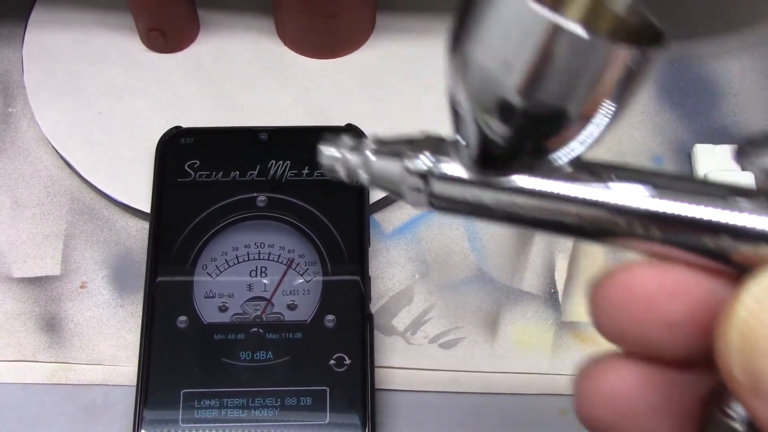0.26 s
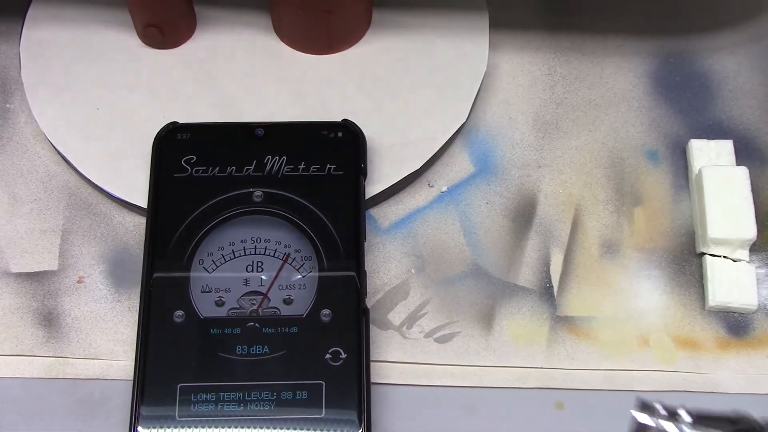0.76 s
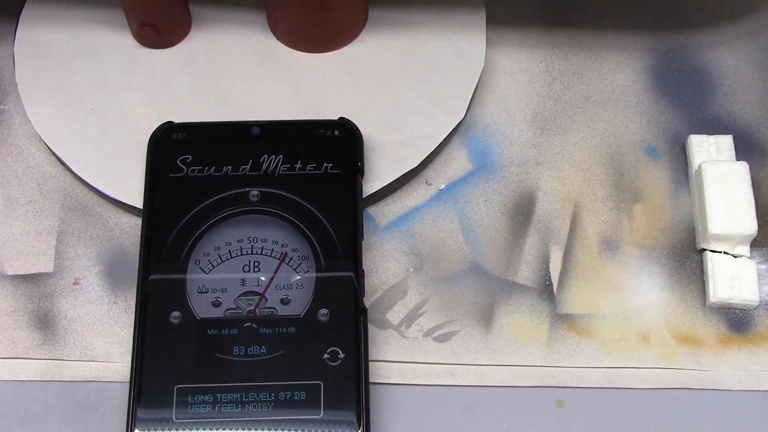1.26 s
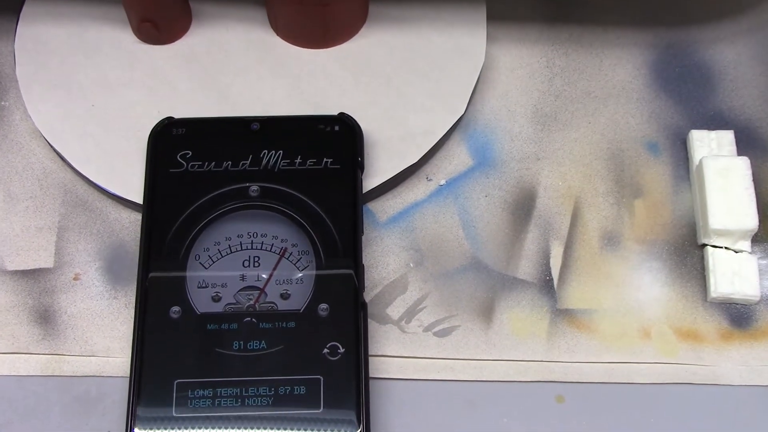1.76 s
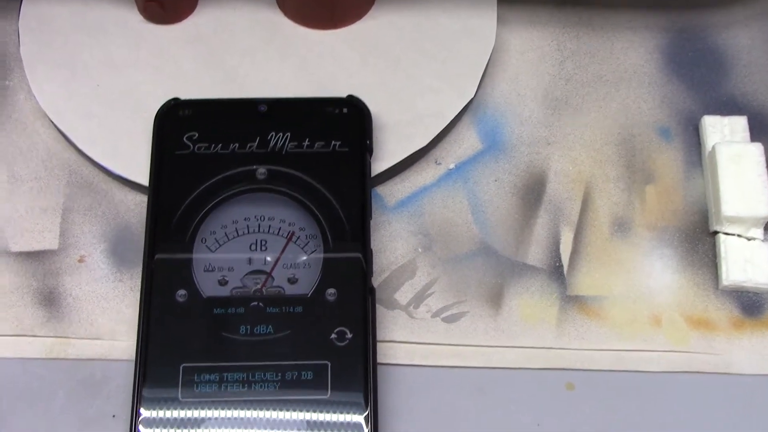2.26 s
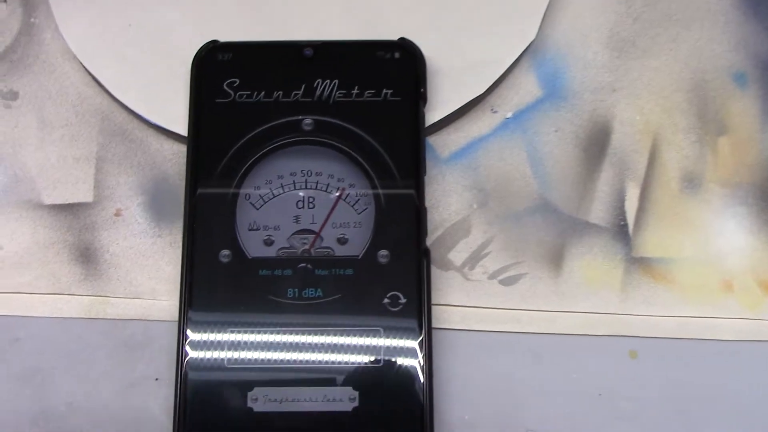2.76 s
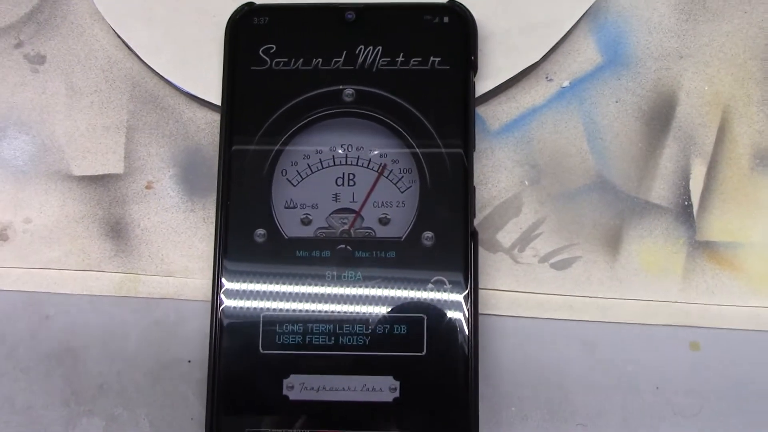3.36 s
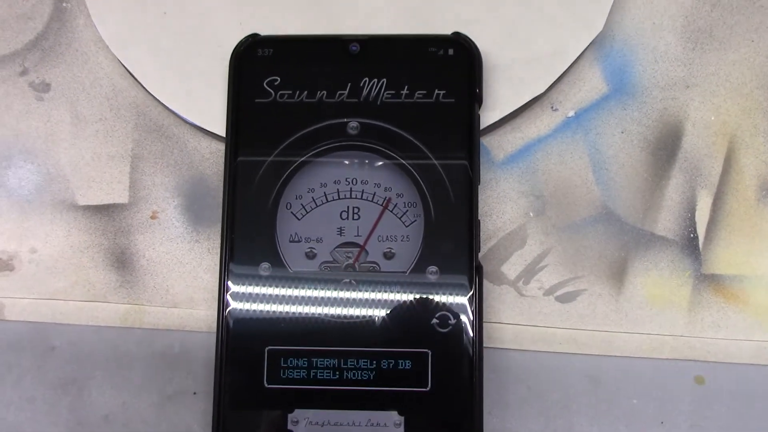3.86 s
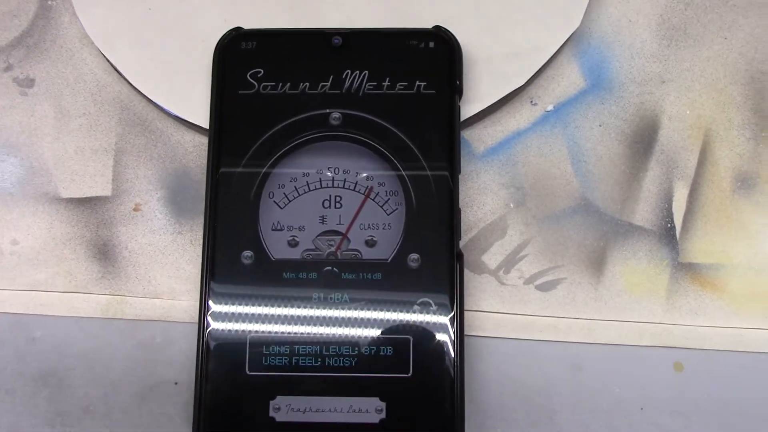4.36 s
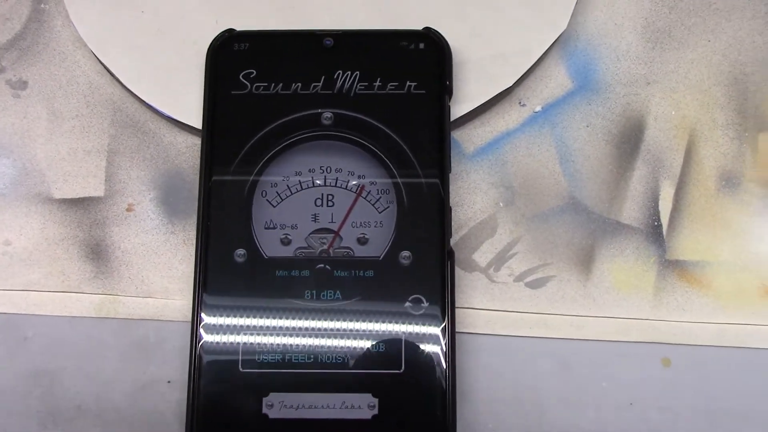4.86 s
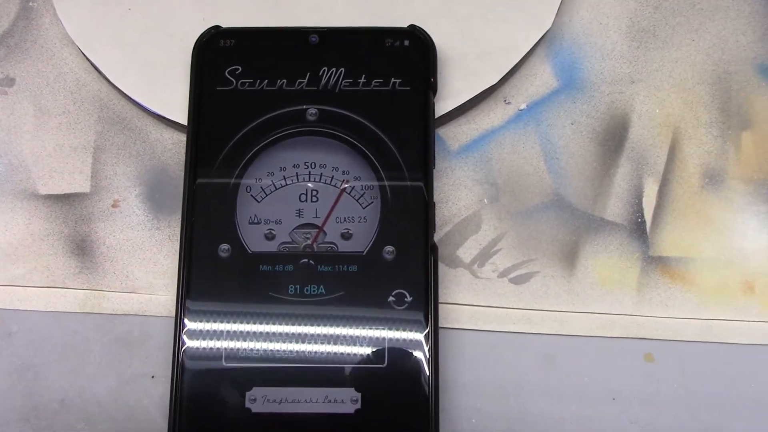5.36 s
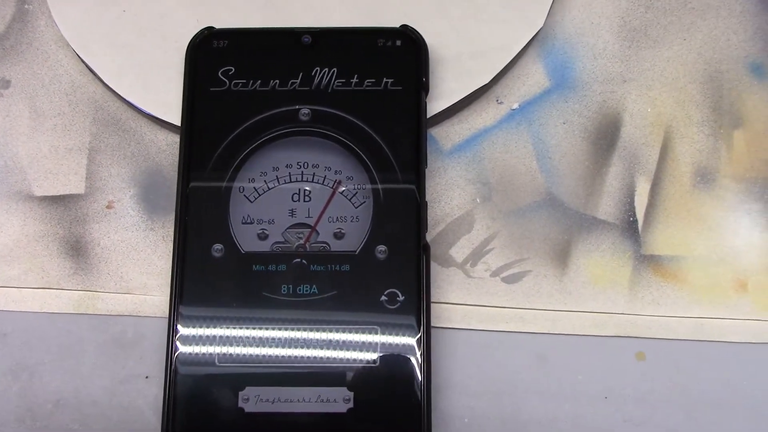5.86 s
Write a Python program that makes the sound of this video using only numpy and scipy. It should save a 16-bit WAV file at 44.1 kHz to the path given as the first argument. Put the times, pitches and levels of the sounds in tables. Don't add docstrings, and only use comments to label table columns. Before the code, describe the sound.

A small piston air compressor runs steadily up close, a fast throbbing drone with metallic valve clatter, electric hum and rushing air in a hard-walled workshop.

```python
import sys
import numpy as np
from scipy import signal
from scipy.fft import rfft, irfft, next_fast_len
from scipy.io import wavfile
from scipy.ndimage import uniform_filter1d, map_coordinates

SR = 44100
rng = np.random.default_rng(int(sys.argv[2]) if len(sys.argv) > 2 else 0)


def gain_from_db(level_db):
    decades = np.asarray(level_db, float) / 20
    return 10 ** decades


def put_to_file(sound):
    columns = np.atleast_2d(sound).T
    safe = np.clip(columns, -1, 1)
    whole_steps = np.round(safe * 32767)
    wavfile.write(sys.argv[1], SR, whole_steps.astype(np.int16))


N = 269451

# (time [s], speed [turns/s])
SHAFT_SPEED = [
    (0, 28.7065),
    (3.3, 28.7065),
    (3.7, 28.703),
    (6.2, 28.703),
]
# (time [s], share of the way [0-1])
SPOT_DRIFT = [
    (0, 0.37),
    (1.5, 0),
    (2.5, 0.3),
    (3.5, 0.83),
    (6.2, .99),
]
# (frequency [Hz], level [dB per Hz])
AIR_RUSH = [(30, -87), (85, -87), (125, -72), (165, -63.5), (260, -64.5), (340, -66.5), (420, -65),
            (530, -57), (650, -61), (950, -59.5), (1900, -63), (4500, -72), (8500, -78), (15500, -86.5)]
# (frequency [Hz], depth [dB])
PUFF_DEPTH = [(1000, 0.06), (4000, 1.3), (8000, 1.1), (14000, 0.99)]
# (frequency [Hz], width [Hz], level at first spot [dB rms], level at second spot [dB rms])
STATOR_MODES = [(985, 25, -45, -45), (1115, 62, -37.5, -37.5)]
# (frequency [Hz], level [dB rms])
HALF_ORDERS = [(250, -70), (370, -60), (416, -47), (445, -64), (540, -50), (660, -62), (810, -52),
               (900, -63)]
# (time [s], peak level [dB])
REED_BURSTS = [
    (.705, -34),
    (2.56, -36),
    (4.92, -29),
    (5.52, -37),
    (5.68, -34),
]
# (time [s], level [dB rms])
REED_CHATTER = [(0, -46), (1, -44), (2, -46), (2.6, -46), (3.2, -48), (4.5, -48), (5, -51), (5.5, -50),
                (6.2, -48)]
# (order [per turn], level at first spot [dB rms], level at second spot [dB rms])
PISTON_STROKE = [(2, -48.9, -49.5), (3, -48.8, -48), (4, -34.8, -33.4), (5, -28.8, -28.9), (6, -23.6, -24),
                 (7, -28.3, -28), (8, -29.1, -28.7), (9, -38.8, -37.2), (10, -49.5, -52.3),
                 (11, -47.1, -43.6)]
THUMP_ARRIVAL = [(2.5, .76), (3.5, 1.16), (4.5, .74), (5.5, .67), (6.5, .51), (7.5, .15), (8.5, .44),
                 (9.5, .87), (10.5, .49), (11.5, .58)]
RING_KNOCKS = [(12, 16, .15, .35), (18, 21, .15, .95), (24, 26, .03, .04), (26, 27, .58, .58),
               (27, 29, .14, .19), (29, 34, .84, .9), (34, 37, .55, .1), (37, 40, .8, .96),
               (40, 45, .45, .1), (59, 61, .47, .47), (61, 63, .2, .22), (63, 65, .75, .75),
               (65, 67, .14, .14), (67, 69, .35, .35)]
# (frequency [Hz], level over the air around them [dB])
VALVE_CLATTER = [(50, -22), (1000, -17), (1350, -12), (1600, -1), (2250, -4), (2500, 1), (2900, 1),
                 (3500, 3), (4400, 3), (5100, 2), (5800, 1.5), (7500, -6), (10000, -16)]
# (frequency [Hz], level relative to the order [dB])
UNSTEADINESS = [(100, -34), (300, -24), (1000, -20), (2000, -17), (5000, -10)]
# (frequency [Hz], width [Hz], level at first spot [dB rms], level at second spot [dB rms])
CASING_MODES = [(357.3, 27.3, -25.5, -27.3), (419.7, 116.3, -34.6, -35.6), (457.5, 25.0, -41.5, -36.1),
                (530.2, 26.9, -33.1, -28.7), (583.2, 25.0, -27.6, -25.3), (702.7, 28.2, -25.0, -28.7),
                (747.0, 119.8, -40.3, -41.3), (794.9, 31.4, -30.8, -42.3), (830.5, 25.0, -35.8, -33.5),
                (876.3, 27.7, -28.0, -24.3), (980.1, 80.0, -36.2, -36.1), (991.9, 25.0, -34.0, -23.2),
                (1127.8, 109.9, -34.2, -32.4), (1247.2, 123.7, -40.4, -42.7)]
HEAD_MODES = [(1470.1, 171.3, -48.8, -48.5), (1593.7, 98.2, -42.3, -44.4), (1706.3, 25.3, -33.9, -32.4),
              (1755.5, 25.0, -38.2, -32.2), (1804.7, 45.8, -37.1, -35.9), (1855.5, 25.0, -30.2, -32.8),
              (1921.6, 75.0, -44.6, -41.0), (1967.9, 25.3, -26.2, -33.0), (2078.8, 121.8, -47.2, -44.0),
              (2187.5, 109.2, -52.8, -50.0), (2452.7, 170.0, -53.1, -51.2), (2597.2, 140.0, -49.2, -77.9),
              (2807.5, 39.7, -44.4, -44.4)]
PLATE_MODES = [(3588, 30, -46, -52), (5035, 150, -52, -44.5), (5195, 130, -52, -44)]
# (time [s], level [dB])
PLATE_SOFTENING = [
    (4.7, 1),
    (5.3, -1.5),
]
# (frequency [Hz], side minus mid [dB])
STEREO_WIDTH = [(60, -42), (200, -49), (380, -28), (780, -27.5), (1000, -22.5), (1500, -21), (1850, -17.5),
                (3100, -16.5), (5200, -14), (6500, -14), (9000, -11.5), (12500, -10), (14200, -15),
                (15300, -18)]
# (frequency [Hz], gain [dB])
MIC_COLOUR = [(2300, 0), (2800, 1), (3200, -1.13), (6000, 1), (8300, 0), (9600, 2.5), (10500, -0.5),
              (14300, -0.5), (14900, -6), (15300, .5), (15700, -5)]

SHAFT_HZ = SHAFT_SPEED[0][1]
PLATE_FROM = 170


def read(points, hz):
    f, value = np.transpose(points)
    return np.interp(np.log(hz + 1), np.log(f + 1), value)


def curve(rows, t):
    return np.interp(t, *np.transpose(rows))


def coloured(x, points):
    size = next_fast_len(N)
    gain = gain_from_db(read(points, np.fft.rfftfreq(size, 1 / SR)))
    return irfft(rfft(x, size) * gain, size)[:N]


def chance(*shape):
    return (rng.standard_normal(shape) + 1j * rng.standard_normal(shape)) / np.sqrt(2)


def rings(modes, hz):
    centre, width, *db = np.transpose(modes)[:, :, None]
    detuning = 2 * (hz - centre) / width
    power = gain_from_db(np.array(db)) ** 2 / (1 + detuning ** 2) ** 4
    return np.sqrt(power.sum(1))


def walls(x):
    t60, echo_db, length = .12, -12, 4000
    decay = gain_from_db(-60 * np.arange(length) / SR / t60)
    echoes = rng.choice([-1, 1], length) * (rng.random(length) < .05) * decay
    echoes = np.append(1, gain_from_db(echo_db) * echoes / np.linalg.norm(echoes))
    return signal.oaconvolve(x, echoes / np.linalg.norm(echoes))[:N]


def air(turns):
    note_hz, note_width, note_db = 220, 12, -47
    puff_at = 0.26
    noise = coloured(rng.standard_normal(N), AIR_RUSH) * np.sqrt(SR / 2)
    hz, t, z = signal.stft(noise, SR, nperseg=256, noverlap=192)
    angle = 2 * np.pi * (np.interp(t * SR, np.arange(N), turns) - puff_at)
    stroke = 0.61 * np.cos(angle) + np.cos(2 * angle)
    z = z * gain_from_db(read(PUFF_DEPTH, hz)[:, None] * stroke)
    rush = signal.istft(z, SR, nperseg=256, noverlap=192)[1][:N]
    column = signal.iirpeak(note_hz, note_hz / note_width, SR)
    note = signal.lfilter(*column, rng.standard_normal(N))
    return walls(rush) + gain_from_db(note_db) * note / note.std()


def hum(t, turns):
    pull_hz = 120
    pull_low, pull_high, pull_db = 6, 29, -53
    slots, slot_db = 30, -49.5
    scatter_db = 2
    order = np.arange(42)
    pull = gain_from_db(pull_db) * (order % 2 == 0) * (order >= pull_low) * (order < pull_high)
    pull = np.maximum(pull, rings(STATOR_MODES, 2 * pull_hz + order * SHAFT_HZ)[0])
    half_db = read(HALF_ORDERS, (order + .5) * SHAFT_HZ)
    half = gain_from_db(half_db + scatter_db * rng.standard_normal(len(order)))
    # (multiple of pull_hz, shaft order, gain)
    lines = [(2, k, g) for k, g in zip(order, pull)]
    lines += [(0, k + .5, g) for k, g in zip(order, half)]
    lines += [(3, slots, gain_from_db(slot_db)), (4, slots, gain_from_db(slot_db))]
    out = np.zeros(N)
    for mains, k, gain in lines:
        if gain > gain_from_db(-62):
            waver = np.interp(t, np.linspace(0, t[-1], 16), 1 + 0.3 * rng.standard_normal(16))
            cycles = mains * pull_hz * t + k * turns + rng.random()
            out += gain * np.sqrt(2) * waver * np.sin(2 * np.pi * cycles)
    return out


def rattles(t):
    reed_hz, reed_width, burst_length = 5060, 240, 0.019
    noise = rng.standard_normal(N)
    for _ in range(2):
        noise = signal.lfilter(*signal.iirpeak(reed_hz, reed_hz / reed_width, SR), noise)
    bursts = sum(gain_from_db(db - 6.0) * np.exp(-((t - at) / burst_length) ** 2) for at, db in REED_BURSTS)
    return noise / noise.std() * (gain_from_db(curve(REED_CHATTER, t)) + bursts)


def strike_phases(count, thump):
    phase = 2 * np.pi * rng.random(count)
    if thump:
        arrivals = [share for _, share in THUMP_ARRIVAL]
        phase[2:13] = -1.7 - 2 * np.pi * np.cumsum([0] + arrivals)
        for low, high, early, late in RING_KNOCKS:
            delays = np.cumsum(np.linspace(early, late, high - low))
            phase[low + 1:high + 1] = phase[low] - 2 * np.pi * delays
    return phase


def pump(turns, thump):
    steps = 8192
    head_db, odd_db = 1.2, -4.5
    order, count = np.arange(400), int(turns[-1]) + 3
    hz = order * SHAFT_HZ

    weak = gain_from_db(read(AIR_RUSH, hz) + read(VALVE_CLATTER, hz)) * np.sqrt(SHAFT_HZ)
    first = chance(len(order))
    second = 0.62 * first + 0.53 * chance(len(order))
    spots = weak * np.array([first, second])

    rung = np.hypot(rings(CASING_MODES + PLATE_MODES, hz), gain_from_db(head_db) * rings(HEAD_MODES, hz))
    rung = rung * gain_from_db(odd_db * (order % 2) * (order > PLATE_FROM))
    rung[:, 2:12] = gain_from_db(np.transpose(PISTON_STROKE)[1:])
    phase = strike_phases(len(order), thump)
    strong = rung.max(0) > np.maximum(weak / 2, gain_from_db(-56))
    spots = np.where(strong, rung * np.exp(1j * phase), spots)
    spots[:, :2] = 0

    turn_time = np.arange(count) / SHAFT_HZ
    share = curve(SPOT_DRIFT, turn_time)[:, None]
    slow = rng.standard_normal((count, len(order), 2))
    slow = uniform_filter1d(slow, size=5, axis=0) @ [1, 1j] * 1.07
    z = (1 - share) * spots[0] + share * spots[1]
    z = z * (1 + gain_from_db(read(UNSTEADINESS, hz)) * slow)
    softening = curve(PLATE_SOFTENING, turn_time)[:, None]
    z = z * gain_from_db(softening * (order > PLATE_FROM) * (order < PLATE_FROM + 16))

    shapes = irfft(z, steps) * steps / np.sqrt(2)
    return map_coordinates(shapes, [turns, turns % 1 * steps], order=1, mode="grid-wrap")


def scene():
    t = np.arange(N) / SR
    turns = np.cumsum(curve(SHAFT_SPEED, t)) / SR
    mid = pump(turns, True) + hum(t, turns) + air(turns) + rattles(t)
    side = coloured(pump(turns, False) + hum(t, turns) + air(turns), STEREO_WIDTH)
    lean = coloured(mid, [(300, -45), (1000, -28), (2000, -54)])
    lean = lean - coloured(mid, [(2500, -65), (8000, -25), (14000, -29)])
    return np.array([mid + side + lean, mid - side - lean])


def low_pass(x):
    return signal.sosfilt(signal.butter(12, 15740, fs=SR, output="sos"), x)


def record(dry):
    heard = np.array([coloured(channel, MIC_COLOUR) for channel in dry])
    return low_pass(heard)


dry = scene()
out = record(dry)
put_to_file(out)
```